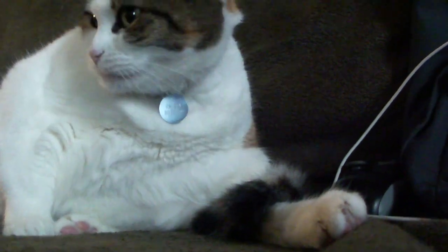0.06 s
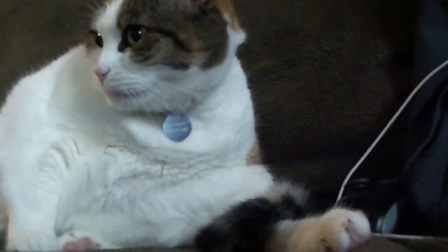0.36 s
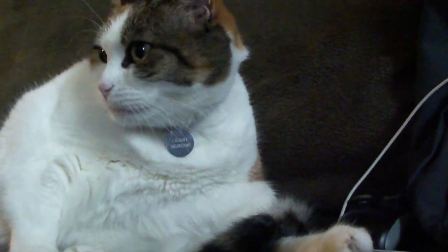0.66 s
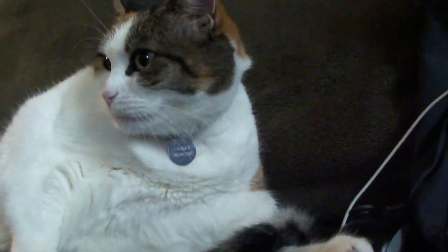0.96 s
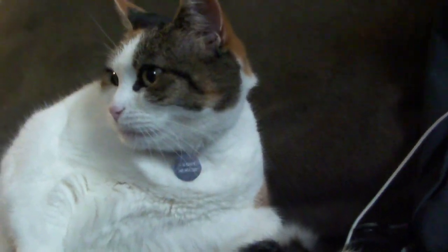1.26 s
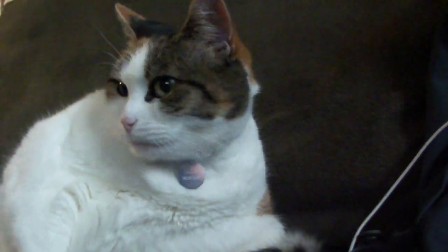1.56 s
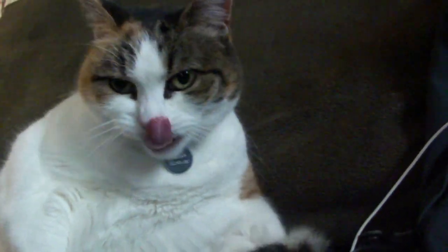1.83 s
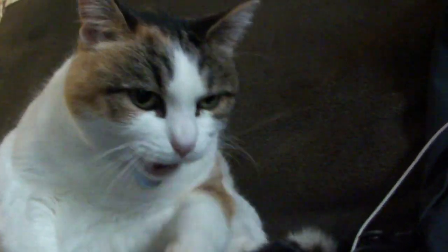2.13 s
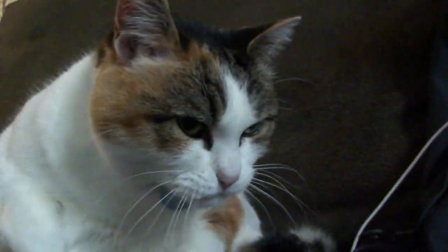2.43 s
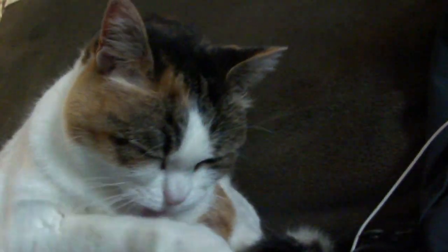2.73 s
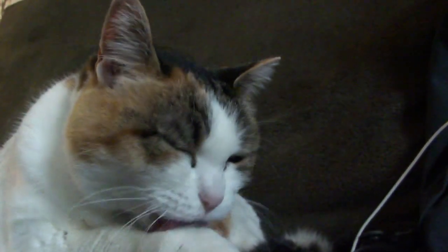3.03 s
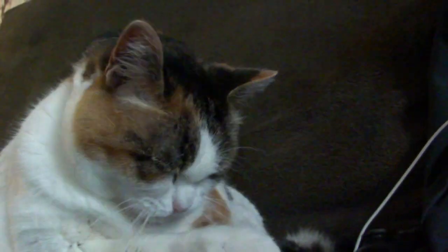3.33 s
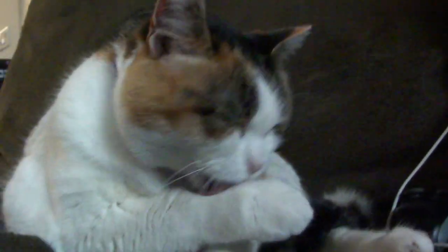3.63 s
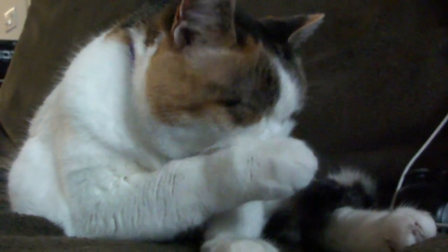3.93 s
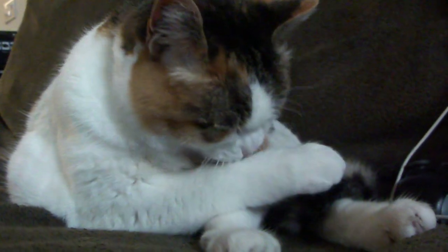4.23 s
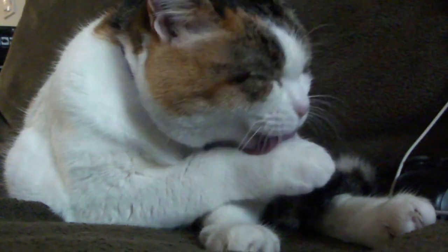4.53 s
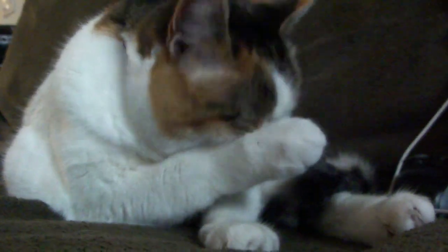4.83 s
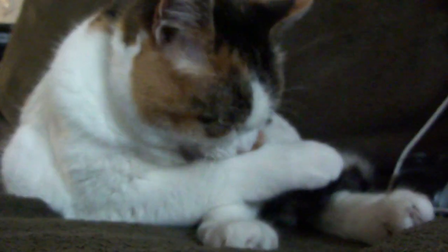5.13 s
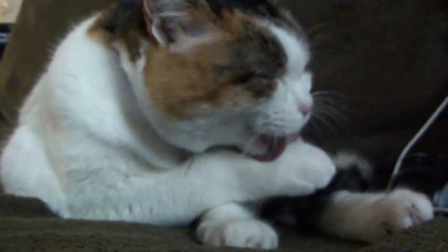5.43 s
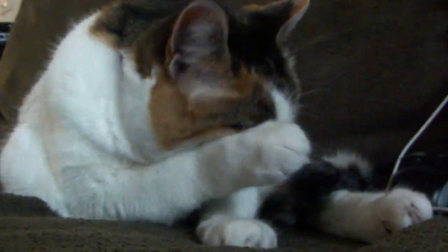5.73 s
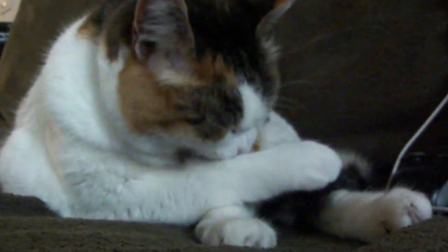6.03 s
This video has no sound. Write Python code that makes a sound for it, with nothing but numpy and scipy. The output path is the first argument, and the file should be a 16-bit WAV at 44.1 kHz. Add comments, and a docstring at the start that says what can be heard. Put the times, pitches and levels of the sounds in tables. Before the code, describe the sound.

Soft, even room hiss runs throughout, with a faint, thin electronic buzz and whine from a small hand-held camera. At about 0.6 seconds its lens motor starts ticking unevenly over a light drone. Fingers rub with a low rumble and knock on the case, right at the microphone and stronger on the left: a hard bump at 0.9, a loud sharp crack at 1.2, another knock at 1.7, then smaller bumps. From 3.2 to 3.5 seconds comes a loud cluster of knocks with a brief crunching slide and another crack. The motor then stops. Much more quietly, a nearby cat washes its foreleg. Its wet mouth clicks at 3.7 and 3.9 seconds, and more weakly at 4.3 and 5. Faint, high rasps of tongue through fur come in strokes from 3.6 seconds until the end, around 6.4. A few brief, thin high tones barely flicker in the hiss.

```python
"""A quiet room, where a cat on a couch washes its foreleg close to a small hand-held camera.
The tongue rasps faintly through the fur and the wet mouth clicks.
Much louder, fingers knock and rub on the camera's case while its lens motor ticks and drones.
The camera's electronics buzz and whine thinly throughout, over the soft hiss of the room.
Faint, thin high tones flicker in the hiss."""
import sys
import numpy as np
from scipy import signal
from scipy.fft import rfft, irfft, next_fast_len
from scipy.io import wavfile

SR = 44100
rng = np.random.default_rng(int(sys.argv[2]) if len(sys.argv) > 2 else 0)


def digitize_waveform(pressure):
    """Quantize a signal to 16-bit integers and store it at the path in sys.argv[1].

    Rows of a 2-D input are taken as channels; values are limited to [-1, 1].
    """
    field = np.atleast_2d(pressure).T
    bounded = np.clip(field, -1, 1)
    quanta = np.round(bounded * 32767).astype(np.int16)
    wavfile.write(sys.argv[1], SR, quanta)


N = 276948
T = np.arange(N) / SR
FRAME_HZ, FIELD_HZ = 29.97, 59.94  # the camera's pictures and half-pictures per second
MOTOR_ON_S, MOTOR_OFF_S, MOTOR_FADE_S = 0.564, 3.55, 0.12  # when the lens motor has power

# how hard the hand rubs on the case: (time [s], level [dB])
GRIP_LEVELS = [(.5, -74), (.62, -51), (.8, -47.5), (.95, -37.5), (1.03, -44), (1.18, -38.5), (1.32, -48),
               (2.5, -51.5), (3.15, -49), (3.44, -38.5), (3.495, -39), (3.55, -84)]
# strong steps of the lens as it hunts for focus: (time [s], level [dB])
FOCUS_STEPS = [(.616, -38), (.648, -30), (.684, -34), (.714, -30.5), (.781, -30.5), (0.848, -28),
               (.952, -34.5), (1.251, -31), (1.283, -29), (1.348, -25.5), (1.483, -33), (1.517, -36),
               (1.549, -29), (1.616, -36.5), (1.651, -33), (1.717, -30), (1.784, -30.5), (1.85, -30.5),
               (1.917, -33), (1.985, -37), (2.017, -35.5), (2.283, -32), (2.349, -35.5), (2.483, -31.5),
               (2.586, -30.5), (2.752, -35), (2.821, -34.5), (3.017, -31), (3.053, -36), (3.085, -34),
               (3.152, -29), (3.184, -32.5)]


def fur_rasps(width_hz=3000, grain_db=3, tuft_db=2.0, count=900):
    """Hairs slip off the barbs of the tongue, tuft by tuft, as a spray of tiny ticks."""
    # rasps of fur, first as the cat shifts, then as it licks:
    # (peak time [s], rise [s], fall [s], level [dB], left minus right [dB], centre pitch [Hz])
    rasps = [(.48, .16, 0.046, -65.5, 17, 6600), (.502, .003, 0.0036, -60, 10, 6350),
             (1.02, .004, .005, -59, 10, 7200), (1.187, .004, 0.0033, -60, 13, 7300),
             (3.555, 0.073, 0.056, -64.5, 19, 6200), (3.765, 0.087, 0.14, -59.5, 11, 7240),
             (4.33, 0.03, 0.04, -60, 6, 6900), (4.53, .07, 0.16, -66, 8, 8200),
             (4.61, 0.022, 0.046, -55, 3, 7900), (4.77, 0.038, 0.033, -70, 13, 6400),
             (4.865, .015, 0.091, -65.5, 7, 7600), (5.01, .04, .06, -63, 3, 3400),
             (5.08, 0.24, 0.54, -71, 14, 6750), (5.43, .012, 0.032, -67, 4.5, 8800),
             (5.69, 0.12, 0.33, -64, 9.5, 7000), (6.26, 0.087, .15, -66.5, 7, 6700)]
    out = np.zeros((2, N))
    tufts = random_swells(tuft_db, count)
    slipping = rng.random((2, N)) < .06
    slips = slipping * rng.standard_normal((2, N)) * undb(grain_db * rng.standard_normal((2, N)))
    slips = slips + .5 * slips[::-1]  # each side also hears the other
    spray = butter(tufts * slips, 3300, "high", order=2)
    for s, rise, fall, db, pan_db, hz in rasps:
        swell = np.exp(-np.abs(T - s) / np.where(T < s, rise, fall))
        gains = undb(db + np.array([[pan_db], [-pan_db]]) / 2)
        out += gains * swell * unit(ring(spray, hz, width_hz))
    return out


def mouth_clicks(mouth_hz=1900, snap_hz=7400, burst_s=0.00077, size=1024):
    """A film of saliva breaks, and its very short crackle makes the small mouth ring."""
    # wet clicks: (time [s], level [dB], share of high snap [dB])
    clicks = [(3.654, -37.5, -29), (3.882, -34, -4), (4.253, -49, -20), (4.987, -45, -16)]
    out = np.zeros(N)
    for (s, db, snap_db), noise in zip(clicks, rng.standard_normal((len(clicks), size))):
        burst = noise * np.exp(-T[:size] / burst_s)
        mouth = butter(ring(burst, mouth_hz, width_hz=1300), 2900, "low", order=4)
        click = mouth + undb(snap_db) * ring(burst, snap_hz, width_hz=1200)
        add(out, s, undb(db) * click / np.abs(click).max())
    return np.array([out, out])


def knocks():
    """Each knock of a finger is one push on the case; a fleshy one also makes the shell thud."""
    # finger knocks, brighter when harder:
    # (time [s], level [dB], treble limit [Hz], sharp edge [dB], shell thud [dB])
    contacts = [(0.577, -29.5, 593, -26, -3), (0.8933, -7.5, 590, -38, 6.5), (0.9224, -31, 220, -45, 6),
                (1.0045, -22.5, 1500, -32, -8), (1.0815, -25, 470, -45, 13.5), (1.134, -29, 450, -45, -3),
                (1.1561, -24.5, 1040, -18, 3), (1.198, -24, 1210, -30, -13), (1.2086, -16.5, 257, -45, -8),
                (1.3543, -31, 640, -22, 7), (1.6804, -18, 1490, -6.5, 0), (1.761, -28.5, 189, -45, -8),
                (1.784, -38, 190, -45, -3), (2.367, -37.5, 184, -17, 5.5), (2.616, -39.5, 280, -25, 6),
                (2.787, -35.5, 186, -11, 0), (3.11, -40, 190, -30, -2), (3.2377, -19, 560, -40, 4),
                (3.2632, -18.5, 537, -45, 2), (3.3072, -23, 620, -35, 3), (3.328, -23, 576, -26, 12.5),
                (3.348, -17.5, 600, -50, 9), (3.36, -31, 400, -45, 8), (3.368, -32, 395.8, -45, -9),
                (3.3919, -2, 1820, -13, -6), (3.418, -30, 403, -42, 6), (3.427, -28, 330, -42, 3),
                (3.4791, -8.5, 523, -29, -16), (3.4921, -16, 690, -7.5, 7), (3.501, -14.5, 1810, -17, -3),
                (3.5044, -13, 1470, -24, -20), (3.5126, -12.5, 2280, -6, -17)]
    out = np.zeros(N)
    for s, db, top_hz, edge_db, thud_db in contacts:
        start = s - 0.43 / top_hz  # early, so the push peaks near its listed time
        add(out, start, undb(db) * shell(push(top_hz, edge_db), thud_db))
    return through_case(out, right_db=-9.5)


def push(top_hz, edge_db, size=4096):
    """One short push on the case that springs back; a harder one is briefer and recovers sooner."""
    kick = signal.unit_impulse(size)
    pressed = butter(kick, top_hz, "low", order=4) + undb(edge_db) * butter(kick, top_hz, "low", order=1)
    spring_hz = 126 * (top_hz / 1000) ** 0.72
    bump = butter(pressed, spring_hz, "high", order=2)
    return bump / np.abs(bump).max()


def shell(x, thud_db):
    """The camera's shell adds a low thud that dies quickly."""
    return x + undb(thud_db) * ring(x, hz=128, width_hz=120)


def overloads(rise_s=0.00006, swing_decay_s=0.001, right_lag_s=.00008, size=4096):
    """Hard knocks overload the sound input: a sharp spike sags at once, then swings back and dies."""
    # cracks: (time [s], spike [dB], sag [s], wait before the swing [s], swing [dB],
    # swing pitch [Hz], right side [dB])
    cracks = [(0.8938, -27, .0002, .0005, -32, 400, -12), (1.2072, 0, 0.00024, 0.00076, 1.5, 372, -3.5),
              (3.485, -4.5, 0.00078, 0.0009, -2, 264, -10)]
    out, t = np.zeros((2, N)), T[:size]
    for s, spike_db, sag_s, wait_s, swing_db, swing_hz, right_db in cracks:
        spike = np.exp(-t / sag_s) * (1 - np.exp(-t / rise_s))
        swing_time = np.maximum(t - wait_s, 0)
        swing = np.sin(2 * np.pi * swing_hz * swing_time) * np.exp(-swing_time / swing_decay_s)
        crack = undb(swing_db) * swing - undb(spike_db) * spike / spike.max()
        add(out[0], s, crack)
        add(out[1], s + right_lag_s, -undb(right_db) * butter(crack, 3200, "low", order=2))
    return out


def finger_shifts(over_grip_db=3, scatter_db=5, top_hz=190, spread_octaves=1.44, count=100):
    """The fingers shift their hold at random: small dull bumps, stronger the firmer the grip."""
    out = np.zeros(N)
    for k, (when, strength, hardness) in enumerate(rng.uniform(-0.97, 1, (count, 3))):
        s = (k + .5 + when / 2) * T[-1] / count
        db = np.interp(s, *np.transpose(GRIP_LEVELS)) + over_grip_db + scatter_db * strength
        add(out, s, undb(db) * push(top_hz * 2 ** (spread_octaves * hardness), edge_db=-25))
    return through_case(shell(out, thud_db=-2), right_db=-12)


def grip_rub(rumble_hz=125, whirr_db=-11):
    """Skin creeps unevenly over the case: a low rumble, with a faint whirr from the lens barrel."""
    level = undb(np.interp(T, *np.transpose(GRIP_LEVELS)))
    creep = random_swells(spread_db=3, count=200)
    rumble = butter(ring(rng.standard_normal(N), rumble_hz, width_hz=170), 320, "low", order=2)
    whirr = undb(whirr_db) * unit(barrel(rng.standard_normal(N)))
    return through_case(level * (unit(rumble * creep) + whirr), right_db=-7.0)


def finger_slide(start_s=3.404, end_s=3.514, slips_per_s=2500, scatter_db=3, top_hz=2200, edge_db=-13):
    """A finger sticks and slips over the case, crunching louder as it presses, until it lets go."""
    slipping = rng.random(N) < slips_per_s / SR
    slips = slipping * rng.standard_normal(N) * undb(scatter_db * rng.standard_normal(N))
    dull = butter(slips, top_hz, "low", order=4)
    edge = undb(edge_db) * butter(slips, top_hz, "low", order=1)
    crunch = unit(butter(dull + edge, 150, "high", order=1))
    pressure = undb(np.interp(T, [start_s, end_s], [-48, -30])) * (T > start_s) * (T < end_s)
    return through_case(pressure * crunch, right_db=-10.5)


def lens_steps(step_s=0.001198, stop_gain=0.63, weak_db=-41, scatter_db=2.5, size=2048):
    """The lens steps once a picture, mostly weakly, jolting its barrel as it starts and as it stops."""
    jolts = np.zeros(N)
    frames = np.arange(FOCUS_STEPS[0][0], MOTOR_OFF_S, 1 / FRAME_HZ)
    strong_times = np.array(FOCUS_STEPS)[:, 0]
    weak_levels = weak_db + scatter_db * rng.standard_normal(size)
    weak_steps = [(s, db) for s, db in zip(frames, weak_levels)
                  if np.abs(strong_times - s).min() > .5 / FRAME_HZ]
    for (s, db), stretch in zip(FOCUS_STEPS + weak_steps, rng.uniform(-0.88, 1, size)):
        add(jolts, s - step_s * (1 + 0.28 * stretch), undb([db]))
        add(jolts, s, stop_gain * undb([db]))
    one_jolt_peak = barrel(signal.unit_impulse(size)).max()
    return through_case(barrel(jolts) / one_jolt_peak, right_db=-8.5)


def barrel(x):
    """The barrel, the tube around the lens, rings at a few pitches when shaken."""
    # the barrel's own notes: (pitch [Hz], width [Hz], level [dB])
    notes = [(767, 64, 8.5), (860, 130, -6), (1390, 170, -14), (1690, 110, -17), (2300, 99, -34)]
    return sum(undb(db) * ring(x, hz, width) for hz, width, db in notes)


def lens_drone(drone_db=-55.0, hz=742, width_hz=16, whirr_db=-56, pulsing=.85):
    """The motor keeps the barrel's lowest note droning, under a whirr that swells with each picture."""
    drone = undb(drone_db) * unit(ring(ring(rng.standard_normal(N), hz, width_hz), hz, width_hz))
    swell = 1 + pulsing * np.cos(2 * np.pi * FRAME_HZ * (T - FOCUS_STEPS[0][0]))
    whirr = undb(whirr_db) * unit(swell * ring(rng.standard_normal(N), hz=1750, width_hz=260))
    return through_case(motor_power() * (drone + whirr), right_db=-7.5)


def motor_power():
    """From 0 while the lens motor rests to 1 while it has power."""
    return np.clip(np.minimum(T - MOTOR_ON_S, MOTOR_OFF_S - T) / MOTOR_FADE_S + .5, 0, 1)


def electronics(buzz_db=(-65.5, -61), whine_db=(-75, -70), burst_s=0.00045):
    """A tiny burst of hiss with each half-picture, and a thin whine; both grow while the lens works."""
    from_burst_s = (T - .0014 + .5 / FIELD_HZ) % (1 / FIELD_HZ) - .5 / FIELD_HZ
    bursts = rng.standard_normal(N) * np.exp(-.5 * (from_burst_s / burst_s) ** 2)
    buzz = unit(butter(ring(bursts, hz=4800, width_hz=1500), 5100, "low", order=2))
    whine = unit(waver(rng.standard_normal(N), hz=7867, width_hz=50))
    buzz *= undb(np.interp(motor_power(), [0, 1], buzz_db))
    whine *= undb(np.interp(motor_power(), [0, 1], whine_db))
    return through_case(buzz + whine, right_db=-13.5)


def thin_tones(width_hz=90, right_db=-12):
    """Short, wavering high tones that barely rise out of the hiss."""
    # faint high tones: (start [s], length [s], pitch [Hz], level [dB])
    tones = [(0.504, .025, 4780, -53), (.524, 0.066, 5250, -54), (3.80, .045, 3520, -63),
             (4.72, .04, 3380, -61), (4.9, .04, 5260, -62), (5.07, .06, 7200, -68), (5.37, .04, 6780, -62)]
    out, noise = np.zeros(N), rng.standard_normal(N)
    for s, length, hz, db in tones:
        swell = np.sin(np.pi * np.clip((T - s) / length, 0, 1))
        out += undb(db) * waver(noise, hz, width_hz) * swell
    return np.array([out, undb(right_db) * out])


def room(db=-49.0, side_lift=0.44):
    """Soft, even room noise; the close-set microphones make its middle pitches sound wider."""
    # still air and microphone hiss: (pitch [Hz], level [dB])
    air_tone = [(40, -19), (90, -15), (150, -7.5), (240, -5), (400, -2.5), (700, -5), (1200, -8.5),
                (2000, -12.5), (3500, -23.5), (6000, -23.5), (8500, -21.5), (11000, -25), (15500, -20)]
    # pitches at which the room rings: (pitch [Hz], width [Hz], added level [dB])
    room_notes = [(157.6, 6.8, 5), (389, 18, -9)]
    air = colour(rng.standard_normal((2, N)), air_tone)
    mid, side = air + sum(undb(note_db) * ring(air, hz, width) for hz, width, note_db in room_notes)
    side = side + side_lift * ring(side, hz=820, width_hz=1700)
    return undb(db) * unit(np.array([mid + side, mid - side]))


def through_case(x, right_db):
    """The shaking case reaches left and right as mirror images, the left more strongly."""
    return np.array([x, -undb(right_db) * x])


def camera_filters(x):
    """The camera colours the sound and cuts three narrow gaps in the treble, near 3, 4 and 5 kHz."""
    # the camera's tone: (pitch [Hz], gain [dB])
    tone = [(1900, 0.5), (2400, -1), (2900, -12), (3500, -10), (4500, -12.5), (5200, -9.5), (5900, -1),
            (9500, -6), (11000, -14), (11900, -39), (13000, -23.5), (13700, -23), (14700, -16.5)]
    # the narrow gaps: (pitch [Hz], width [Hz])
    gaps = [(3020, 260), (4010, 190), (5000, 150)]
    x = colour(x, tone)
    for hz, width in gaps:
        for _ in range(2):
            x = x - ring(x, hz, width)
    return x


def undb(db):
    """Turn decibels into a number to multiply by."""
    return 10 ** (np.asarray(db) / 20)


def unit(x):
    """Scale a sound to an average power of 1."""
    return x / np.sqrt(np.mean(x ** 2))


def butter(x, hz, kind, order):
    """Keep the "low" or "high" side of a pitch; a higher order cuts more steeply."""
    return signal.sosfilt(signal.butter(order, min(hz, SR * .45), kind, fs=SR, output="sos"), x)


def ring(x, hz, width_hz):
    """Ring at one pitch; the narrower the width, the longer it rings."""
    return signal.lfilter(*signal.iirpeak(hz, hz / width_hz, fs=SR), x)


def waver(noise, hz, width_hz):
    """A tone of even level whose pitch wanders a little."""
    band = ring(ring(noise, hz, width_hz), hz, width_hz)
    return np.cos(np.angle(signal.hilbert(band, next_fast_len(N))[:N]))


def random_swells(spread_db, count):
    """A volume that glides between `count` random levels."""
    return undb(spread_db * np.interp(T, np.linspace(0, T[-1], count), rng.standard_normal(count)))


def colour(x, points, size=2048):
    """Shape the tone along a curve of (pitch [Hz], gain [dB]) points."""
    hz, db = np.transpose(points)
    grid = np.maximum(np.fft.rfftfreq(size, 1 / SR), 1)
    gain = undb(np.interp(np.log(grid), np.log(hz), db))
    cepstrum = irfft(np.log(gain))
    cepstrum[1:size // 2] *= 2  # folded, so the filter never rings ahead of a sound
    cepstrum[size // 2 + 1:] = 0
    response = irfft(np.exp(rfft(cepstrum)))
    return np.array([signal.fftconvolve(row, response)[:N] for row in x])


def add(track, s, sound):
    """Mix a short sound into a track from time s on."""
    i = int(np.clip(s * SR, 0, N - 1))
    track[..., i:i + sound.shape[-1]] += sound[..., :N - i]


def scene():
    """The cat, the handled camera and the room; the overloads arise after the camera's filters."""
    hand = knocks() + finger_shifts() + grip_rub() + finger_slide()
    mix = fur_rasps() + mouth_clicks() + hand
    mix = mix + thin_tones() + lens_steps() + lens_drone() + electronics() + room()
    return camera_filters(mix) + overloads()


def record(dry, low_cut_hz=66, gentle_cut_hz=85, top_hz=15800):
    """The camera cuts the deep bass and the highest treble."""
    x = butter(butter(dry, gentle_cut_hz, "high", order=1), low_cut_hz, "high", order=2)
    return signal.sosfilt(signal.ellip(10, .2, 90, top_hz, fs=SR, output="sos"), x)


dry = scene()
out = record(dry)
digitize_waveform(out)
```